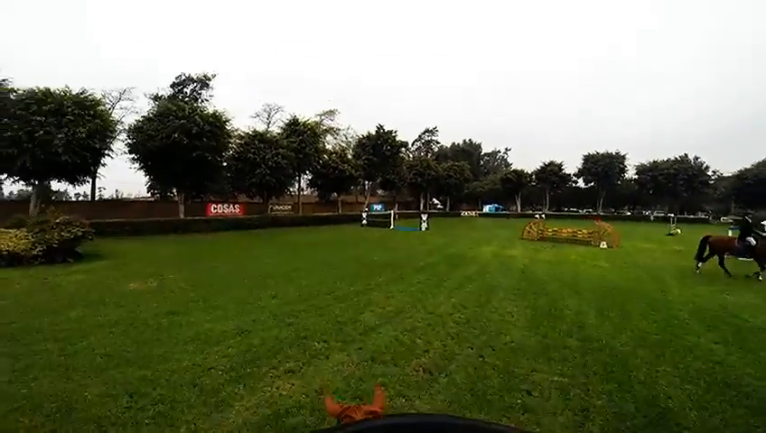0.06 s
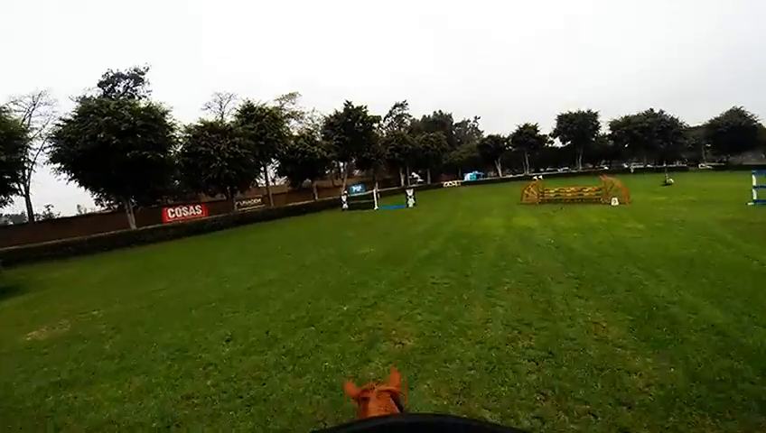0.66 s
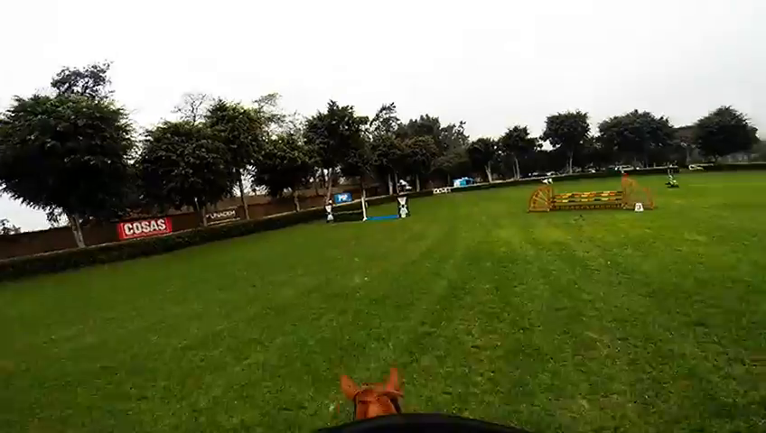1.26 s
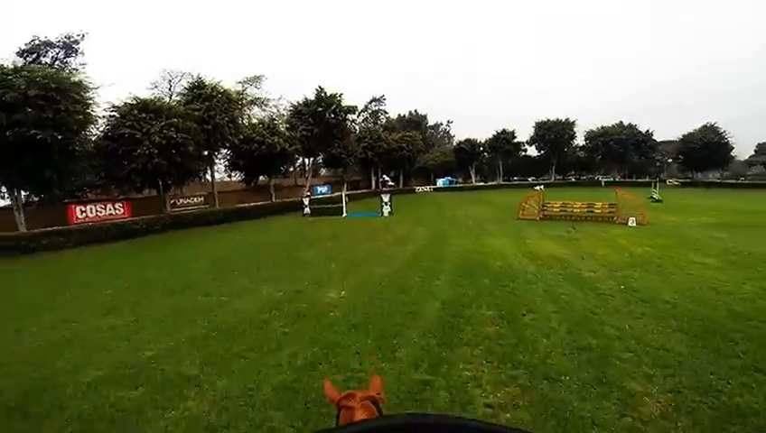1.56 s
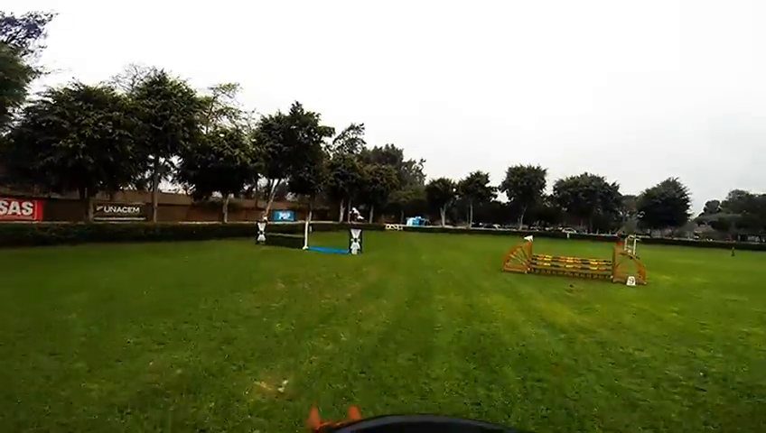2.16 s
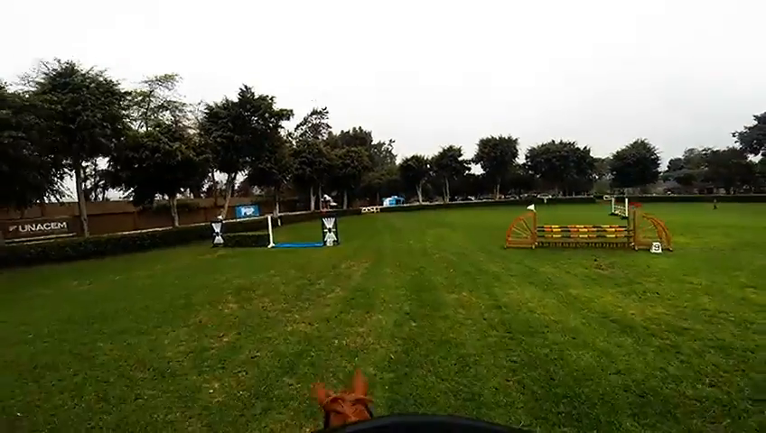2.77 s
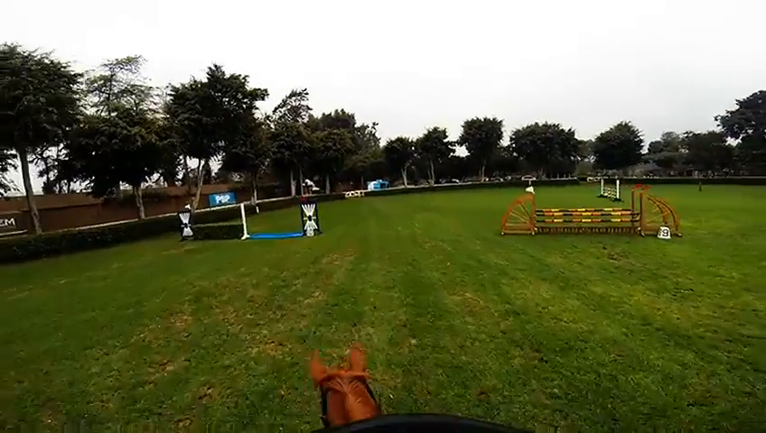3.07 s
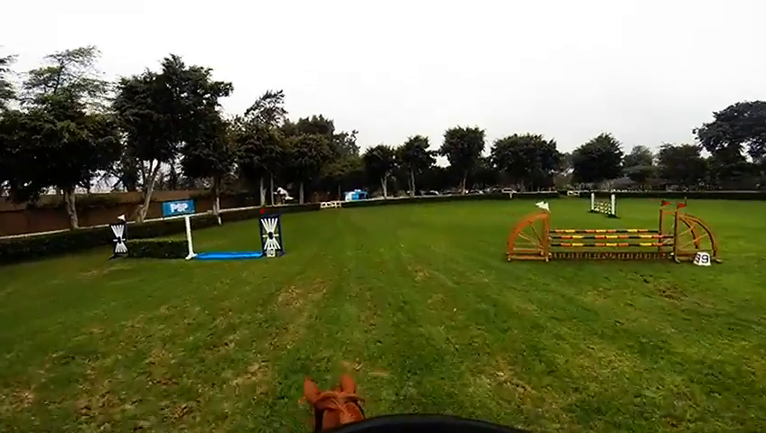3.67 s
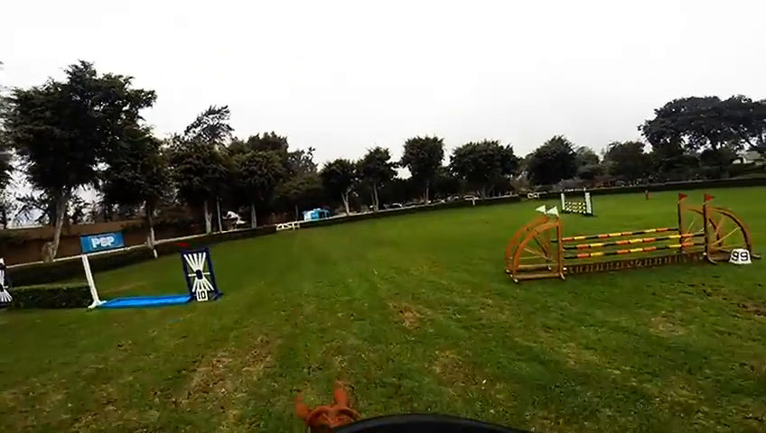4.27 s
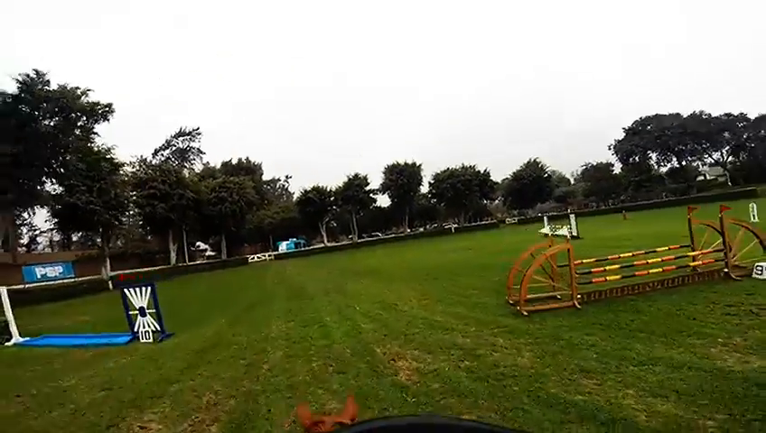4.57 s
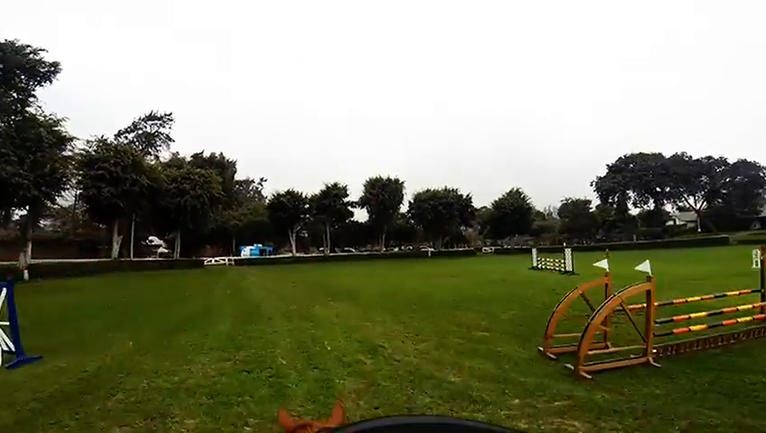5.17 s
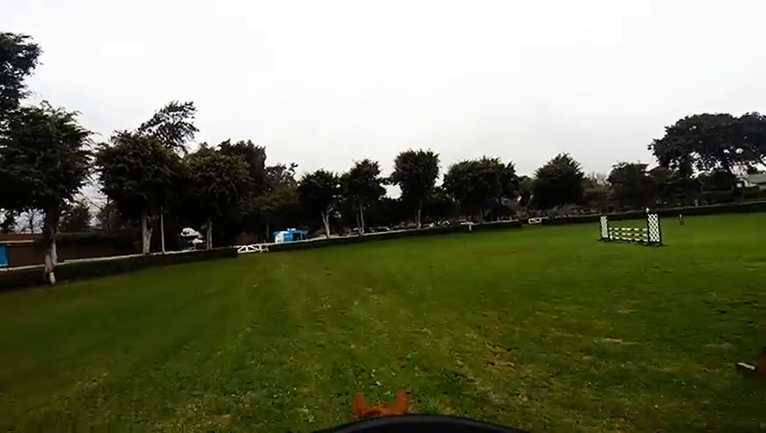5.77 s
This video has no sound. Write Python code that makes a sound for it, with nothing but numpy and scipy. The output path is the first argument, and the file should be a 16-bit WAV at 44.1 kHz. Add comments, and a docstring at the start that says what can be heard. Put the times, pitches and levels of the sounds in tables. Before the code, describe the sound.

Dull, hollow hoofbeats on turf, heard from the saddle, each with a low microphone wobble and a knock of tack.

```python
"""A horse running over turf

The run is heard from a camera worn by the rider. Each hoof lands with a short hollow thud, jolts the
springy camera mount into a deep wobble and shakes a knock from the tack, which also clacks on and between
the hoofbeats. Grass scuffs and the rider's gear rubs, over faint field hiss, wind and electronic whine."""
import sys
import numpy as np
from scipy import signal
from scipy.fft import rfft, irfft
from scipy.io import wavfile

SR = 44100
rng = np.random.default_rng(int(sys.argv[2]) if len(sys.argv) > 2 else 0)


def store_wav(level_fs):
    """Save 16-bit WAV to argv[1]."""
    pcm = np.round(np.clip(np.atleast_2d(level_fs), -1, 1) * 32767)
    wavfile.write(sys.argv[1], SR, pcm.T.astype(np.int16))


N = 261072
TIME = np.arange(N) / SR


# Hoofbeats, bunched about three times a second. Each row: start in seconds, thud level in dB,
# pitch in Hz, overtone level in dB, jolt level in dB, knock level in dB. All levels are relative.
HOOFBEATS = [(0.023, -15, 139, -40, -16, -31.5), (0.091, -29.5, 137, -11, -14, -32.5),
             (0.102, -14.5, 167, -60, -12, -28), (0.320, -11.5, 112, -20.5, -12.5, -31.5),
             (0.397, -19.5, 139, -12.5, -39, -45), (0.427, -14, 165, -33.5, -9, -33.5),
             (0.694, -20.5, 126, -11, -13.5, -33.5), (0.747, -15, 171, -21, -12.5, -25.5),
             (0.909, -29.5, 161, -30, -13.5, -30.5), (0.975, -20.5, 123, -16.5, -9, -32.5),
             (1.291, -20.5, 123, -17.5, -8.5, -23), (1.359, -24.5, 173, -16, -11.5, -29),
             (1.582, -30, 185, -20, -6.5, -35.5), (1.598, -24.5, 153, -10, -11, -28.5),
             (1.998, -19.5, 173, -27, -10.5, -29), (2.033, -19, 149, -43, -19.5, -46),
             (2.081, -5, 153, -26, -2, -20.5), (2.234, -23, 141, -16, -15, -35),
             (2.304, -17, 131.5, -20.5, -13.5, -36.5), (2.452, -24, 194, -14, -28, -55),
             (2.529, -22, 161, -17, -21, -30), (2.667, -13.5, 149.5, -28, -18, -28.5),
             (2.735, -18.5, 147, -20.5, -24, -31), (2.795, -24, 154, -29, -13.5, -43),
             (2.9, -25.5, 148, -34, -9.5, -34.5), (2.957, -23, 163, -7, -17.5, -34),
             (2.977, -25.5, 170, -9, -52, -30.5), (3.027, -24.5, 183, -8, -52, -39),
             (3.056, -20.5, 158, -18.5, -40, -45), (3.331, -16, 122, -18.5, -16, -28),
             (3.407, -18, 166, -22, -10, -32), (3.605, -20, 136, -15, -16, -38),
             (3.706, -16, 152, -19.5, -24.5, -32.5), (3.883, -30, 165.5, -33, -20, -37),
             (3.991, -17, 157.5, -17.5, -13, -29), (4.069, -22.5, 146, -19.5, -39, -34),
             (4.104, -22, 159, -28, -17.5, -41), (4.24, -21, 145, -48, -12, -32),
             (4.273, -10.5, 139, -33.5, -40, -41), (4.406, -22.5, 151, -19.5, -19, -35),
             (4.647, -12.5, 151, -14.5, -35, -17), (4.730, -22, 165, -15, -25.5, -33.5),
             (4.745, -20, 157, -20, -28, -33), (4.939, -20, 168, -20.5, -16, -34),
             (5.054, -15, 167, -23, -22.5, -36), (5.093, -25, 166, -21, -17.5, -31.5),
             (5.216, -18.5, 164, -13, -20.5, -23), (5.323, -19.5, 164, -20, -39, -22),
             (5.434, -18, 159, -21.5, -28, -34.5), (5.569, -21.5, 166, -31, -13, -17),
             (5.589, -19.5, 135, -18.5, -25, -24.5), (5.666, -26.5, 188, -7, -55, -35.5),
             (5.722, -28, 159, -9, -35, -46), (5.910, -23, 140, -3, -38, -25)]
# Higher modes of the thud. Each row: frequency in Hz, relative level in dB, 60 dB decay time in seconds.
THUD_MODES = [(277, -16, 0.11), (317, -1, 0.043), (370, 3, 0.052)]

def hooves(thud_db=1, overtone_db=9.5, boom_t60=0.11, boom_scatter=0.27, give_s=0.00079, turf_hz=430):
    """Damped impact: turf gives under each hoof with a dead low weight, a hollow boom and dull modes."""
    t, out = TIME[:SR // 4], np.zeros(N)
    soil = rng.standard_normal((len(HOOFBEATS), len(t)))
    firmness = rng.standard_normal(len(HOOFBEATS))
    weight = from_db(-6) * ring(t, hz=95, t60=0.072)
    modes = sum(from_db(db) * ring(t, hz, t60) for hz, db, t60 in THUD_MODES)
    onset = 1 - np.exp(-t / give_s)
    for (s, db, hz, upper_db, *_), clods, firm in zip(HOOFBEATS, soil, firmness):
        t60 = boom_t60 * 2 ** (boom_scatter * firm)   # firm ground booms longer
        boom = (ring(t, hz, t60) + weight) * onset
        # soil crumbles unevenly, so each footfall excites its own mix of modes
        contact = (t == 0) + 0.078 * clods * fade(t, t60=0.035)
        response = signal.fftconvolve(contact, modes)[:len(t)]
        overtones = peak_one(lowpass(response, turf_hz, order=5))
        thud = peak_one(boom + from_db(upper_db + overtone_db) * overtones)
        add(out, s, -from_db(db + thud_db) * thud)
    return out


# Soft lurches of the rider between hoofbeats. Each row: time in seconds, level in dB.
LURCHES = [(0.148, -17), (0.281, -13), (1.241, -19.5), (1.657, -13), (2.626, -19), (3.231, -17.5),
           (3.289, -19), (3.949, -26), (4.57, -23.5), (4.635, -16), (5.29, -17), (5.865, -28)]

def jolts(lag_s=0.0121, usual_push_s=0.006, usual_db=-10.5, halving_db=37, lurch_push_s=0.016):
    """Shock transmission: landings pass through horse and rider, and firmer ones push more briefly."""
    landings = [(s + lag_s, db, usual_push_s * 2 ** ((usual_db - db) / halving_db))
                for s, _, _, _, db, _ in HOOFBEATS]
    return landings + [(s, db, lurch_push_s) for s, db in LURCHES]


# Modes of the mount. Each row: frequency in Hz, relative level in dB, 60 dB decay time in seconds.
MOUNT_MODES = [(38.02, 23, 0.32), (80, 10.5, 0.043)]
# Spectrum of mount rumble and of wind. Each row: frequency in Hz, relative density in dB.
RUMBLE_SPECTRUM = [(15, -31), (24, -2.5), (38, -6.5), (60, -4.5), (100, -19), (200, -23.5), (400, -35)]

def mount(rumble_db=-17, lowest_hz=12):
    """Shock response: each jolt rocks the springy mount, and a brief push also wakes its stiffer mode."""
    t, out, pushes = TIME[:SR], np.zeros(N), jolts()
    modes = sum((-1) ** k * from_db(db) * ring(t, hz, t60)
                for k, (hz, db, t60) in enumerate(MOUNT_MODES))
    for s, db, push_s in pushes:
        push = np.sin(np.pi * np.minimum(t[:SR // 20] / push_s, 1)) ** 2
        add(out, s - push_s / 2, from_db(db) * peak_one(signal.fftconvolve(push, modes)))
    wobble = out - lowpass(out, lowest_hz, order=1)   # the slowest motion leaks away
    rumble = from_db(rumble_db) * noise(RUMBLE_SPECTRUM) * after(pushes, rise_s=0.048, t60=0.49)
    return wobble + rumble


# Sharper clacks and clicks of the tack, on and between the hoofbeats. Each row: start in seconds,
# relative level in dB, weights of the snap and of the bright edge against the hollow tock in dB.
CLACKS = [(0.287, -37, -10, -10), (0.32, -29, -4, -6), (0.3267, -24, 10, -9), (0.4708, -32, 12.5, 6.5),
          (0.928, -30.5, 12, -2), (1.336, -37, -9, -12), (1.696, -41, 0, -2), (2.0747, -19.5, -10, -39),
          (2.0923, -10, -7.5, -10.5), (2.162, -35, 2, -3), (2.4394, -37, -11, -10), (2.4857, -32, -29, -24),
          (2.5278, -30, -2, -1.5), (2.543, -29.5, 3, -6), (2.6523, -35, 8, -0.5), (2.927, -35.5, -9, -8),
          (3, -36, -21, -33), (3.5947, -24, 3, 2), (3.9763, -32.5, 0, -6.5), (4.2389, -23.5, 9, -12),
          (4.2595, -27.5, 4.5, -4), (4.2647, -25, -7, -10.5), (4.5492, -35, 3, -4.5),
          (4.6255, -26.5, -13, -28), (4.6514, -11.5, 3, -6), (4.927, -40, -1, -5), (5.143, -33.5, 4, -3.5),
          (5.2281, -14.5, 5, -17.5), (5.3221, -14.5, 2, -11.5)]

def knocks(lag_s=0.0006, usual_db=-29, snap_db=-5.5, edge_db=-15.5, snap_slope=0.38, scatter_db=2):
    """Forced rattling: each hoof shakes the tack, snappier when stronger; sharper clacks join in."""
    scatter = scatter_db * rng.standard_normal((len(HOOFBEATS), 2))
    shaken = []
    for (s, *_, db), (snap_scatter, edge_scatter) in zip(HOOFBEATS, scatter):
        force_db = snap_slope * (db - usual_db)
        shaken.append((s + lag_s, db, snap_db + force_db + snap_scatter, edge_db + edge_scatter))
    return shaken + CLACKS


# Resonances of the tack, from hollow tock to high crack.
# Each row: frequency in Hz, bandwidth in Hz, relative level in dB.
TOCK_MODES = [(742, 220, -10), (1050, 89, -5), (1296, 272, -0.5), (1408, 221, 2.5), (1568, 218, -2)]
SNAP_MODES = [(1876, 130, -1), (2188, 270, 1.6), (2397, 78, 2.4)]
EDGE_MODES = [(2607, 87, -8), (3020, 390, -11.5), (3740, 640, -19)]
CRACK_MODES = [(5670, 1220, 7.5), (6240, 180, 8), (6820, 680, 5), (9000, 690, 1.5), (9960, 270, -3.5)]
# Modes of a metal buckle. Each row: frequency in Hz, relative level in dB, 60 dB decay time in seconds.
BUCKLE_MODES = [(1825, -24, 0.26), (2530, -19, 0.078)]

def tack(tock_db=-5, snap_db=-5, edge_db=-2, crack_db=-12.5, buckle_db=-3, hard_db=-17):
    """Modal excitation: a strike and rattle sound the tack; hard knocks crack and ring a buckle."""
    t, out, events = TIME[:SR // 4], np.zeros(N), knocks()
    roughness = rng.standard_normal((len(events), 2, len(t)))
    buckle = sum(from_db(db + buckle_db) * ring(t, hz, t60) for hz, db, t60 in BUCKLE_MODES)
    strike = 7 * (t == 0)
    for (s, db, snappy_db, bright_db), (rattle, grit) in zip(events, roughness):
        shares = from_db([0, snappy_db, bright_db])
        hollow, snappy, bright = shares / np.linalg.norm(shares)
        rattle_t60 = 0.006 if db > hard_db else 0.022   # firm contacts hardly rattle
        contacts = strike + rattle * fade(t, rattle_t60)
        tock = lowpass(resonate(contacts, TOCK_MODES), hz=2510, order=4)
        snap = lowpass(resonate(contacts, SNAP_MODES), hz=3200, order=4)
        edge = lowpass(resonate(grit * fade(t, t60=0.015), EDGE_MODES), hz=3900, order=4)
        crack = resonate(grit * fade(t, t60=0.0079), CRACK_MODES)
        cushion_db = 0.63 * min(db - hard_db, 0)   # gentle contacts lose their crack
        ringing = np.clip((db - hard_db) / 4, 0, 1)   # full at 4 dB above a hard knock
        knock = (hollow * burst(tock, tock_db)
                 + snappy * (burst(snap, snap_db) + ringing * buckle)
                 + bright * (burst(edge, edge_db) + burst(crack, crack_db + cushion_db)))
        add(out, s, from_db(db) * knock)
    return out


# Spectrum of rustling grass and gear. Each row: frequency in Hz, relative density in dB.
RUSTLE_SPECTRUM = [(240, 18.5), (400, -8), (650, 4), (1020, 0), (2360, -1.5), (3200, -13), (4600, -16),
                   (7000, -34), (10000, -33), (14000, -39)]

def grass(scuff_db=-27):
    """Crushing noise: blades collapse under each hoof in a short grainy scuff."""
    scuff = noise(RUSTLE_SPECTRUM) * grainy(grain_db=4.5, rate_hz=220)
    return from_db(scuff_db) * scuff * after(HOOFBEATS, rise_s=0.013, t60=0.17)


# Rubs of cloth and leather, and two broader rushes.
# Each row: centre in seconds, level in dB, half length in seconds.
RUBS = [(0.02, -57, 0.075), (0.3, -74, 0.039), (0.955, -62, 0.023), (1.42, -64, 0.2), (1.68, -55, 0.06),
        (2.02, -44.5, 0.022), (2.35, -59.5, 0.24), (2.8, -63, 0.16), (3.325, -54.5, 0.036),
        (4.94, -48, 0.022)]
RUSHES = [(3.6, -47.5, 0.047), (5.89, -42, 0.037)]
# Spectrum of the rubbing. Each row: frequency in Hz, relative density in dB.
RUB_SPECTRUM = [(900, -4), (1600, -6.5), (2400, 1), (3000, -8), (4000, -30), (7000, -24.5)]

def rider_gear(steady_db=-71):
    """Sliding friction: cloth and leather rub softly all the time and swell as the rider shifts."""
    rub = (from_db(steady_db) + swells(RUBS)) * noise(RUB_SPECTRUM)
    rush = swells(RUSHES) * noise(RUSTLE_SPECTRUM)
    return (rub + rush) * grainy(grain_db=2.8, rate_hz=110)


# Spectra of the far hiss and of a faint thin tone. Each row: frequency in Hz, relative density in dB.
FIELD_SPECTRUM = [(88, -6), (160, -7), (330, -21), (450, -18.5), (800, -24.5), (1200, -25.5), (1600, -25),
                  (2500, -29), (3300, -32), (4500, -37), (5800, -38), (7500, -44.5), (11000, -46),
                  (15000, -60)]
TONE_SPECTRUM = [(1450, -20), (1575, 3), (1700, -23)]
# The swell of that tone. Each row: centre in seconds, level in dB, half length in seconds.
TONE_SWELL = [(3.7, -65.5, 1)]

def field(hiss_db=-51, wind_db=-52):
    """Ambient noise: broadband hiss and light wind, with a narrow band swelling into a faint tone."""
    hiss = from_db(hiss_db) * noise(FIELD_SPECTRUM)
    tone = swells(TONE_SWELL) * noise(TONE_SPECTRUM)
    wind = from_db(wind_db) * noise(RUMBLE_SPECTRUM)
    return hiss + tone + wind


# Tones of the camera electronics. Each row: frequency in Hz, rms wander in Hz, rms level in dB.
WHINE_TONES = [(11640, 12, -84.5), (14600, 13, -81.5)]

def electronics():
    """Random frequency modulation: two thin tones waver in pitch."""
    whine = 0
    for hz, wander_hz, db in WHINE_TONES:
        pitch = hz + wander_hz * wander(rate_hz=30)
        phase = 2 * np.pi * np.cumsum(pitch) / SR
        whine += from_db(db) * np.sqrt(2) * np.sin(phase)
    return whine


def from_db(db):
    """Decibels to amplitude ratio."""
    return 10 ** (np.asarray(db) / 20)


def rms_one(x):
    """Normalisation to unit rms."""
    return x / np.sqrt(np.mean(x ** 2) + 1e-20)


def peak_one(x):
    """Normalisation to unit peak."""
    return x / (np.max(np.abs(x)) + 1e-20)


def burst(x, db):
    """Energy normalisation: a short sound gets the energy of 3 ms at the given rms level."""
    return from_db(db) * x / np.sqrt(np.sum(x ** 2) / (0.003 * SR) + 1e-20)


def add(track, s, sound):
    """Superposition: a sound joins the track at s seconds."""
    start = max(round(s * SR), 0)
    part = sound[:max(N - start, 0)]
    track[start:start + len(part)] += part


def fade(t, t60):
    """Exponential decay by 60 dB in t60 seconds."""
    return from_db(-60 * t / max(t60, 1e-4))


def ring(t, hz, t60):
    """Free vibration of one damped mode."""
    return np.sin(2 * np.pi * hz * t) * fade(t, t60)


def lowpass(x, hz, order=2):
    """Causal low-pass filtering."""
    return signal.sosfilt(signal.butter(order, min(hz, SR / 2 - 1), fs=SR, output="sos"), x)


def resonate(x, modes):
    """Forced response of parallel resonators of alternating sign."""
    out = 0
    for k, (hz, width, db) in enumerate(modes):
        r = np.exp(-np.pi * width / SR)
        poles = [1, -2 * r * np.cos(2 * np.pi * hz / SR), r * r]
        gain = (-1) ** k * from_db(db) * (1 - r * r) / 2
        out += gain * signal.lfilter([1, 0, -1], poles, x)
    return out


def noise(spectrum):
    """Spectral shaping of white noise, at unit rms."""
    hz, db = np.transpose(spectrum)
    bins = np.maximum(np.arange(N // 2 + 1) * SR / N, 1)
    gain = from_db(np.interp(np.log(bins), np.log(hz), db, left=-100, right=-100))
    return rms_one(irfft(rfft(rng.standard_normal(N)) * gain, N))


def wander(rate_hz):
    """Low-passed random fluctuation, at unit rms."""
    return rms_one(lowpass(rng.standard_normal(N), rate_hz))


def grainy(grain_db, rate_hz):
    """Random amplitude modulation: a flickering gain of unit rms."""
    return rms_one(from_db(grain_db * wander(rate_hz)))


def after(events, rise_s, t60):
    """Incoherent summation: envelopes rise and die away with each event, adding in power."""
    t, power = TIME[:SR // 2], np.zeros(N)
    envelope = np.minimum(t / rise_s, 1) * fade(t, t60)
    for s, db, *_ in events:
        add(power, s - rise_s, (from_db(db) * envelope) ** 2)
    return np.sqrt(power)


def swells(rows):
    """A gain envelope of summed bell curves."""
    return sum(from_db(db) * np.exp(-((TIME - s) / half_s) ** 2) for s, db, half_s in rows)


def scene():
    """Free field: the sources add in one channel, dry in the open air."""
    return (mount() + hooves() + tack() + grass() + rider_gear() + field() + electronics())[None]


def record(dry, cutoff_hz=15100):
    """Band limiting: a steep low-pass removes the highest treble."""
    return signal.sosfilt(signal.ellip(10, 0.1, 80, cutoff_hz, fs=SR, output="sos"), dry)


dry = scene()
out = record(dry)
store_wav(out)
```